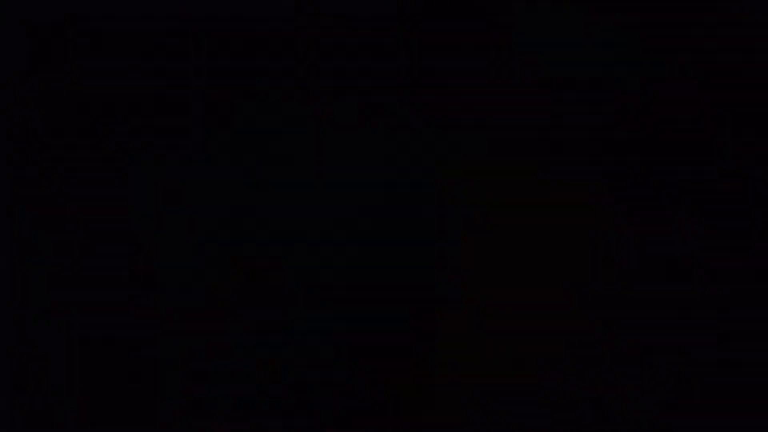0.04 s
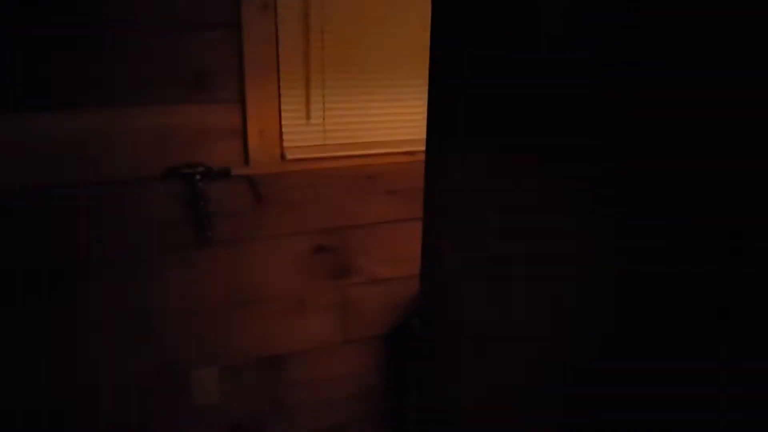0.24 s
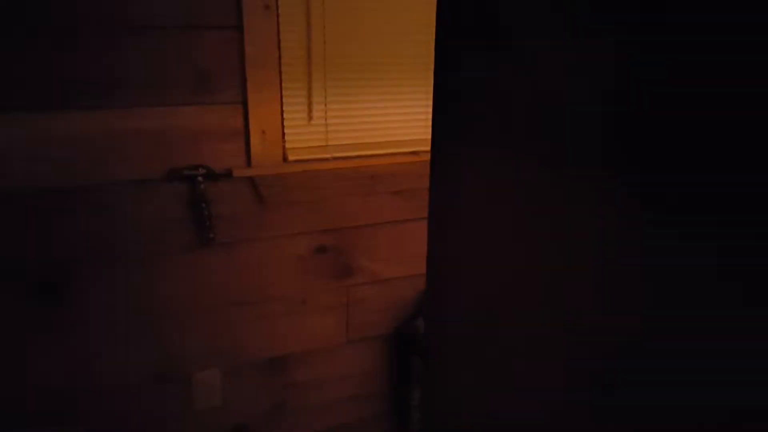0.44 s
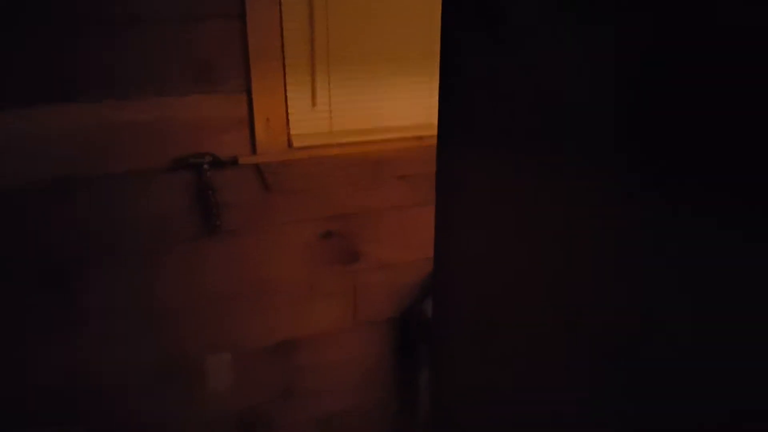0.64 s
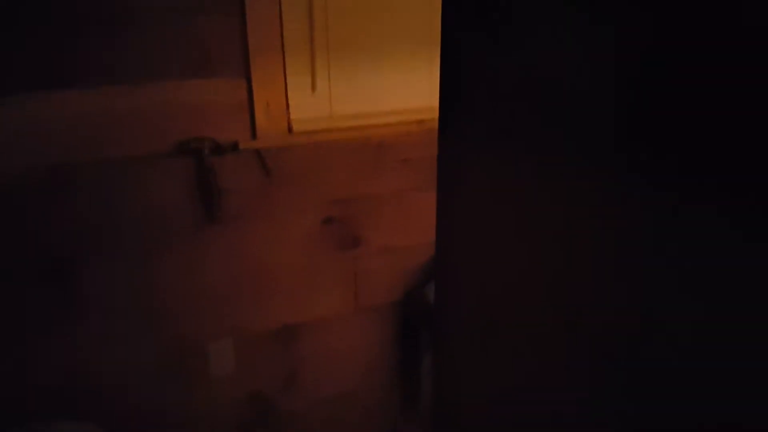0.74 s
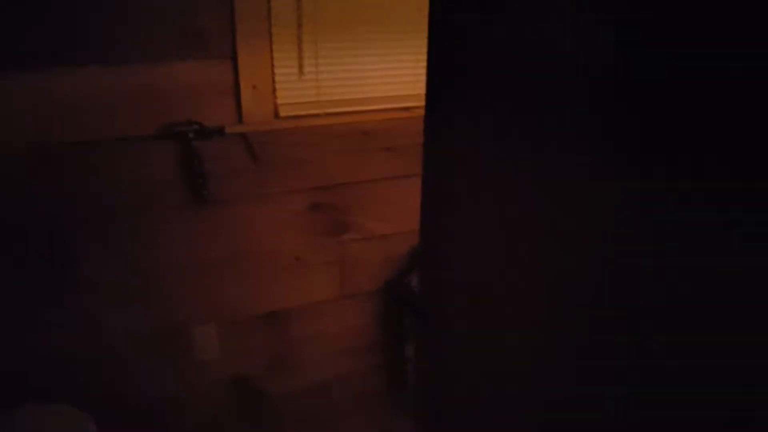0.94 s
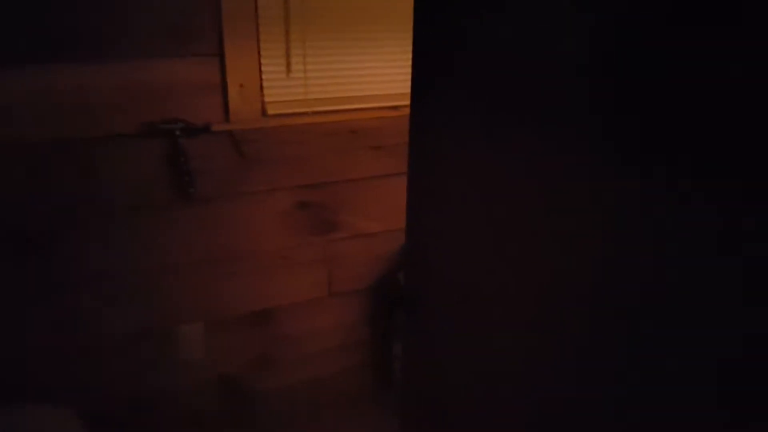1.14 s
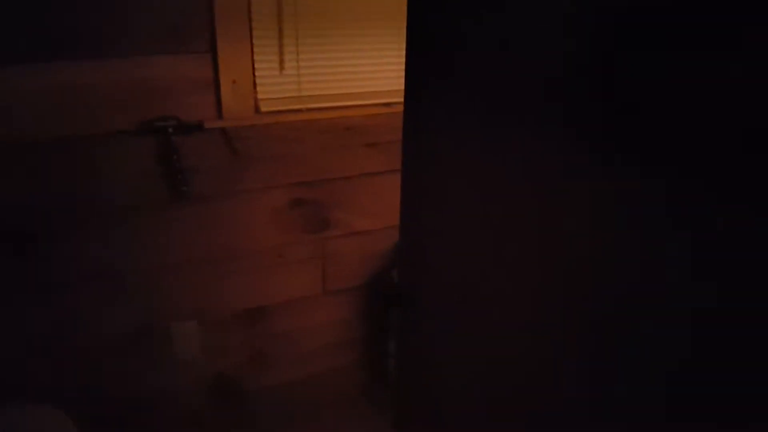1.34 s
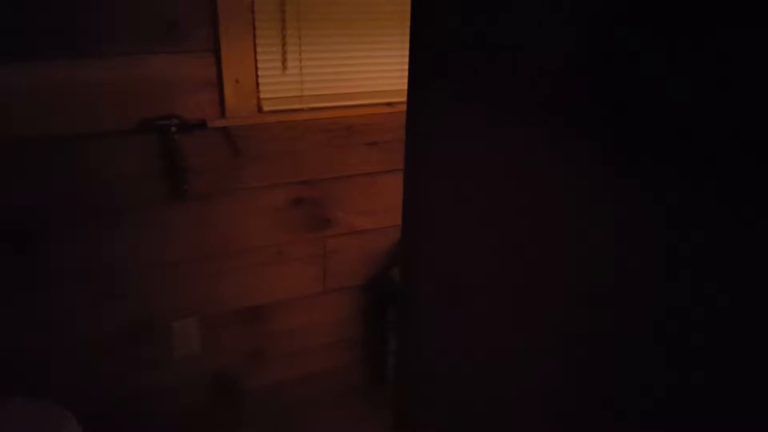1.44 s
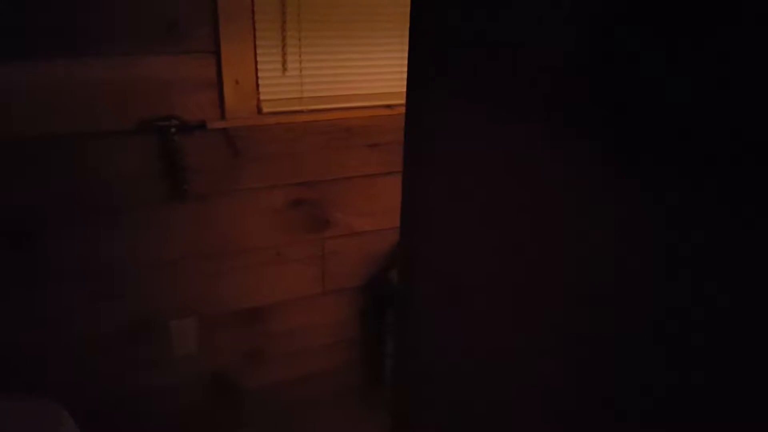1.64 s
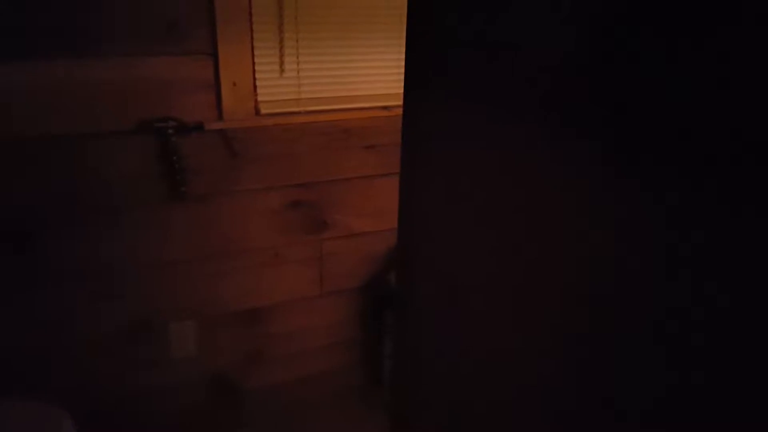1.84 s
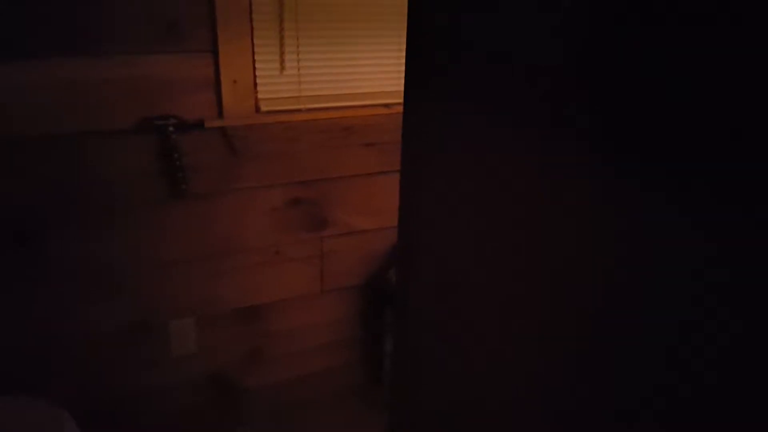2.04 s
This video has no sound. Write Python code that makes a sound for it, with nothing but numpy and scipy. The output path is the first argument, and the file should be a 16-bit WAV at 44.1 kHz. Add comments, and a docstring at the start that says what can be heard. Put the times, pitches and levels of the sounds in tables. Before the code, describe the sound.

Footsteps, sharp and woody, sound slowly to the right in a quiet cabin, with light scuffs and soft taps between them, short room echo, low floor thumps and a thin bed of room air and microphone hiss.

```python
"""Hard heels and toes click on the plank floor of a small quiet cabin, a few metres to the right of a phone.
Each contact is a short burst of force, filtered to the colour of its spot, that rings the planks and the room.
Heavy steps shake the joists: two low decaying modes that swell late.
Under it lie room air and microphone hiss, as shaped noise, and a mains hum, as a sine of wavering level and pitch."""
import sys
import numpy as np
from scipy import signal
from scipy.fft import rfft, irfft, next_fast_len
from scipy.io import wavfile
from scipy.ndimage import uniform_filter1d

SR = 44100
rng = np.random.default_rng(int(sys.argv[2]) if len(sys.argv) > 2 else 0)


def rack_gain(trim_db):
    """Turn a fader trim in dB into the linear factor to multiply a signal by."""
    fader = np.asarray(trim_db, float)
    return 10 ** (fader / 20)


def persist_wave(psi):
    """Save psi, clipped to +-1, as 16-bit WAV."""
    counts = np.round(np.clip(psi, -1, 1) * 32767).astype(np.int16)
    wavfile.write(sys.argv[1], SR, np.atleast_2d(counts).T)


N = 91331
SIZE = 32768  # samples in the response to one contact

# Spectrum of the room air and hiss, relative: f/Hz, level/dB (per Hz)
AIR_SPECTRUM = [(22, -28), (39, -11), (62, -2), (80, 0), (105, -8), (160, -6), (240, -4), (310, -13),
                (630, -16), (1000, -21), (2000, -24), (3200, -29), (4900, -29), (6300, -35), (10500, -39),
                (13000, -37), (15500, -35), (16500, -45)]
AIR_DB, AIR_LEFT_DB, AIR_FLICKER_DB = -63, 0.38, 0.7
AIR_ALIKE_HZ = 509  # the two channels agree below this and part above

# Course of the hum: t/s, level/dB (rms)
HUM_LEVEL = [(0, -76), (.75, -78), (.87, -64.5), (1.05, -79), (1.5, -74), (1.65, -66.5), (1.78, -65.5),
             (1.86, -57), (2.07, -57)]
HUM_HZ = 119

# Shoe contacts: colour, t/s, level/dB (relative), tilt/(dB per octave), contact time/ms
CONTACTS = [("tap", .0170, -20, 4, 6), ("tap", .0450, -38, -3, 16), ("scuff", .1443, -22, 0, 16),
            ("spot 1", .2026, 1, 0, 2.5), ("tap", .6220, -22, 4, 4), ("tap", .6720, -33, 1, 8),
            ("scuff", .7368, -33, 1, 6), ("spot 2", .7630, -20, 0, 9), ("tap", .8000, -36, -3, 12),
            ("tap", .9200, -31, -1.5, 6), ("scuff", 1.2250, -52, -2, 30), ("spot 3", 1.3174, -16, 3, 4),
            ("spot 3", 1.3224, -7, 5, 2.5), ("spot 3", 1.3243, -3, 0, 6), ("scuff", 1.5200, -54, 4, 4),
            ("scuff", 1.7850, -50, 4, 8), ("spot 4", 1.8220, -4, 3, 1.8), ("spot 4", 1.8275, -10, 3, 2.5),
            ("spot 4", 1.8297, -4, -1, 4)]
# Colour of a blow at each spot of the floor, of a sole scuffing and of a soft tap: f/Hz, level/dB (per Hz)
BLOW_COLOURS = { "spot 1": [(100, -18), (200, 6), (310, -7), (420, -5), (750, 1.5), (1000, -8), (1400, -18),
                (2100, -4), (3100, -13), (4300, -24), (8300, -23), (10500, -34), (15500, -35),
                (16900, -75)], "spot 2": [(100, -20), (250, -8), (388, -4), (600, -2), (1100, -2),
                (1940, -7), (3000, -17), (9000, -50), (16000, -75)], "spot 3": [(80, -13), (170, -8),
                (380, -1), (470, 1), (620, -3), (830, -3), (1050, -7), (1210, 0), (1540, -11), (2280, -5),
                (2980, -9), (3400, -17), (5800, -14), (8600, -20), (11000, -31), (13700, -28), (16300, -37),
                (16900, -75)], "spot 4": [(80, -30), (150, -10), (250, 2), (350, -9), (480, -5), (730, -1),
                (1210, 0), (1400, -8), (1680, -4), (2900, -10), (3590, -6), (4100, -16), (5600, -11),
                (8190, -14), (10200, -25), (15200, -22), (16900, -75)], "scuff": [(200, -25), (449, -6),
                (700, -10), (1660, -9), (2700, -3), (3300, -14), (4400, -5), (8300, -18), (10900, -30),
                (14700, -26), (16900, -65)], "tap": [(100, -20), (280, 0), (600, -5), (1000, -14),
                (2000, -40), (8000, -80)]}
TILT_HZ = 2000  # the tilt leaves this frequency unchanged

# Plank modes: f/Hz, level/dB (relative), T60/s
PLANK_MODES = [(189, -12, .2), (231, -9, .18), (282, -7, .22), (375, -10, .26), (427, -11, .22),
               (472, -5, .27), (623, -7, .17), (730, -11, .15), (1188, -12, .13), (1243, -11, .13),
               (2050, -15, .2)]
PLANK_DB, PLANK_SCATTER_DB, PLANK_DETUNE = -46, 2, .004

# Room echoes: f/Hz, T60/s, level/dB
ROOM_ECHOES = [(100, .3, -7), (260, .26, -6), (700, .24, -5), (1840, .18, -5.5), (4850, .14, -8),
               (12800, .1, -10)]
ROOM_BUILD_MS, ROOM_ALIKE_HZ, ROOM_LEFT_DB = 1.5, 600, 1
LATE_DB, LATE_STRETCH = -17, 2.2  # a thin, slower tail from the next room
TAP_ROOM_DB = -11  # soft taps are close by and dry

# Left port, shaded by the phone: f/Hz, level/dB (against the right)
LEFT_SHADE = [(200, -2.5), (1000, -1), (3000, -8), (8000, -9.5), (15000, -12)]
LEFT_LAG_MS = 0.3503
ROOM_SHADE = 0.92  # share of the shading that the planks and echoes also get
DIRECT_LOW_HZ = 600  # below this the crack itself is weak

# Joist thumps: t/s, level/dB of the lower mode, level/dB of the upper mode against the lower
THUMPS = [(0.213, -63, 2), (1.331, -55, 6), (1.829, -48, -1)]
# Joist modes: f/Hz, T60/s
JOIST_MODES = [(37, .6), (73, .35)]
THUMP_RISE_S = 0.036

OFFSET = -.0005  # of full scale


def on_log(table, hz):
    """Interpolation: a table of (f, value) is read linearly on a logarithmic frequency axis."""
    table = np.array(table, float)
    return np.interp(np.log(np.maximum(hz, 1)), np.log(table[:, 0]), table[:, 1])


def pair(size, alike_hz):
    """Coherence: spectra of two noises that agree in the bass and part in the treble."""
    hz = np.fft.rfftfreq(size, 1 / SR)
    mid, side = rfft(rng.standard_normal((2, size)))
    side = side * hz / np.hypot(hz, alike_hz)
    even_power = np.sqrt(1 + hz ** 2 / (hz ** 2 + alike_hz ** 2))
    return np.array([mid + side, mid - side]) / even_power


def walk(rate):
    """Slow random modulation: held random values, rate of them a second, smoothed; spread near 1."""
    hold = int(SR / rate)
    steps_of_chance = np.repeat(rng.standard_normal(N // hold + 1), hold)
    smooth = uniform_filter1d(uniform_filter1d(steps_of_chance, hold), hold)
    return 1.92 * smooth[:N]


def air():
    """Broadband noise: room air and microphone hiss, shaped in spectrum and flickering a little in level."""
    size = next_fast_len(N)
    colour = rack_gain(on_log(AIR_SPECTRUM, np.fft.rfftfreq(size, 1 / SR)))
    noise = irfft(pair(size, AIR_ALIKE_HZ) * colour, size)[:, :N]
    noise = noise / np.sqrt(np.mean(noise.mean(axis=0) ** 2))
    balance_db = np.array([[AIR_LEFT_DB], [0]])
    return noise * rack_gain(AIR_DB + AIR_FLICKER_DB * walk(7.52) + balance_db)


def hum():
    """Modulated tone: a mains hum whose level and pitch waver, its phase the sum of its frequency."""
    s, db = np.array(HUM_LEVEL).T
    hz = HUM_HZ * (1 + 0.011 * walk(10.7))
    level = np.sqrt(2) * rack_gain(np.interp(np.arange(N) / SR, s, db))
    return level * np.sin(2 * np.pi * np.cumsum(hz) / SR)


def causal(db):
    """Minimum phase: folding the cepstrum gives a dB response that never sounds ahead of its cause."""
    cepstrum = irfft(db * np.log(10) / 20)
    cepstrum[1:len(cepstrum) // 2] *= 2
    cepstrum[len(cepstrum) // 2 + 1:] = 0
    return np.exp(rfft(cepstrum))


def contact(t, ms):
    """Impulsive excitation: spectrum of a rough burst of force, evened so that no pitch stands out by chance."""
    rise = 1 - np.exp(-t / .0003)
    force = rfft(rng.standard_normal(SIZE) * np.exp(-(t * 1000 / ms) ** 2) * rise)
    power = np.abs(force) ** 2
    # finer smoothing in the bass, coarser above 2 kHz
    bass = 1 / (1 + (np.fft.rfftfreq(SIZE, 1 / SR) / 2000) ** 4)
    local = bass * uniform_filter1d(power, size=90) + (1 - bass) * uniform_filter1d(power, size=400)
    return force * causal(10 * np.log10(power.mean() / local))


def rings(modes, t, scatter_db, detune):
    """Modal superposition: decaying sines, each with its own chance strength, phase and slight detuning."""
    hz, db, t60 = np.array(modes, float).T[:, :, None]
    strength, phase, shift = rng.standard_normal((3, len(hz), 1))
    envelope = rack_gain(db + scatter_db * strength - 60 * t / t60)
    return (envelope * np.sin(2 * np.pi * hz * (1 + detune * shift) * t + phase)).sum(axis=0)


def planks():
    """Resonance: spectrum of the plank modes ringing after one contact."""
    t = np.arange(SIZE // 2) / SR
    return rack_gain(PLANK_DB) * rfft(rings(PLANK_MODES, t, PLANK_SCATTER_DB, PLANK_DETUNE), SIZE)


def room():
    """Reverberation: left and right spectra of echoes that build up and die octave by octave, even in colour."""
    size = SIZE // 2
    t, hz = np.arange(size) / SR, np.fft.rfftfreq(size, 1 / SR)
    echoes, out = pair(size, ROOM_ALIKE_HZ), 0
    table = np.array(ROOM_ECHOES)
    decay, level = table[:, :2], table[:, ::2]
    for octave in range(9):
        centre = 70 * 2 ** octave
        octaves_off = np.clip(np.log2(np.maximum(hz, 1) / centre), -1, 1)
        band = np.cos(np.pi / 2 * octaves_off) ** 2
        fall_db = -60 * t / on_log(decay, centre)
        out = out + irfft(echoes * band) * (rack_gain(fall_db) + rack_gain(LATE_DB + fall_db / LATE_STRETCH))
    out = rfft(out * (1 - np.exp(-t * 1000 / ROOM_BUILD_MS)), SIZE)
    # divide out the chance colour, then impose the tabled one
    local_db = 10 * np.log10(uniform_filter1d(np.abs(out.mean(axis=0)) ** 2, size=70))
    colour = causal(on_log(level, np.fft.rfftfreq(SIZE, 1 / SR)) - local_db)
    return out * colour * rack_gain(np.array([[ROOM_LEFT_DB], [0]]))


def steps():
    """Linear response: each burst of force cracks, rings the planks, reaches both ports and fills the room."""
    t, hz = np.arange(SIZE) / SR, np.fft.rfftfreq(SIZE, 1 / SR)
    shade_db = on_log(LEFT_SHADE, hz)
    lag = np.exp(-2j * np.pi * hz * LEFT_LAG_MS / 1000)
    ports = np.array([causal(shade_db) * lag, np.ones(len(hz))])
    echo_ports = np.array([causal(ROOM_SHADE * shade_db), np.ones(len(hz))])
    thin = 1j * hz / (1j * hz + DIRECT_LOW_HZ)
    out = np.zeros((2, N + SIZE))
    for spot, s, db, tilt_db, ms in CONTACTS:
        tilt = tilt_db * np.log2(np.maximum(hz, 50) / TILT_HZ)
        blow = contact(t, ms) * causal(on_log(BLOW_COLOURS[spot], hz) + tilt)
        direct, room_db = (ports, TAP_ROOM_DB) if spot == "tap" else (ports * thin, 0)
        response = direct + rack_gain(room_db) * echo_ports * (planks() + room())
        start = int(s * SR)
        out[:, start:start + SIZE] += rack_gain(db) * irfft(blow * response)
    return out[:, :N]


def thumps():
    """Low structural modes: heavy steps set the joists swaying, late and low."""
    out = np.zeros(N)
    for s, db, upper_db in THUMPS:
        start = int(s * SR)
        t = np.arange(N - start) / SR
        levels = (db, db + upper_db)
        modes = [(hz, gain_db, t60) for (hz, t60), gain_db in zip(JOIST_MODES, levels)]
        swell = 1 - np.exp(-(t / THUMP_RISE_S) ** 2)
        out[start:] += rings(modes, t, scatter_db=1.5, detune=.02) * swell
    return out


def scene():
    """Superposition: steps and joist thumps add to the air and hum of the quiet cabin."""
    return air() + hum() + steps() + thumps()


def band_limit(x):
    """A steep low-pass at the top of the band."""
    return signal.sosfilt(signal.butter(12, 16650, fs=SR, output="sos"), x)


def record(dry):
    """Direct-current bias: a small converter offset shifts the whole waveform."""
    mix = dry + OFFSET
    return band_limit(mix)


dry = scene()
out = record(dry)
persist_wave(out)
```